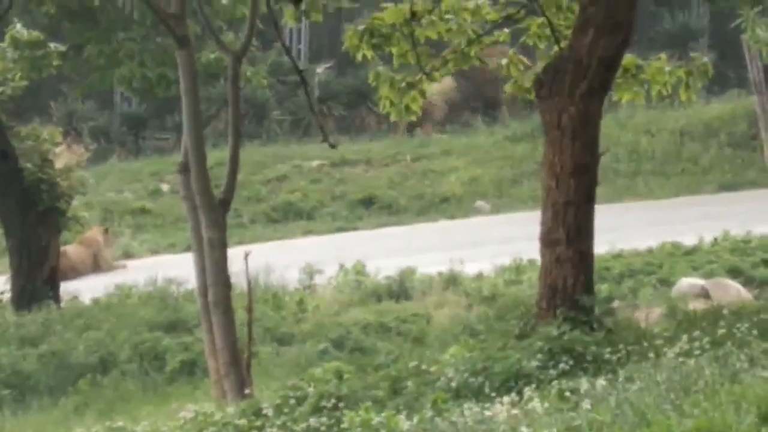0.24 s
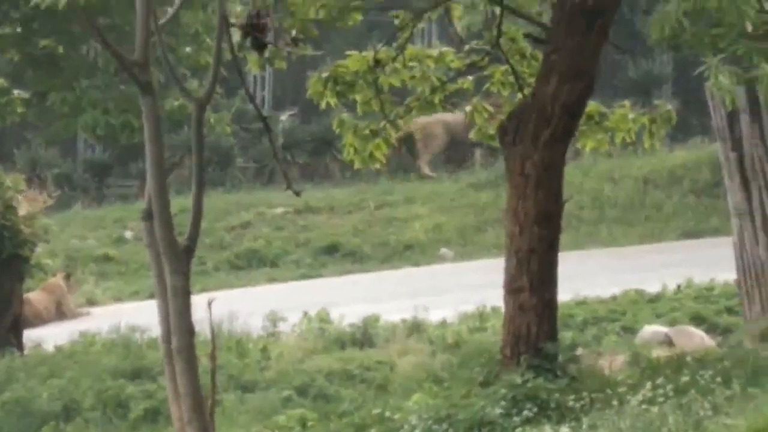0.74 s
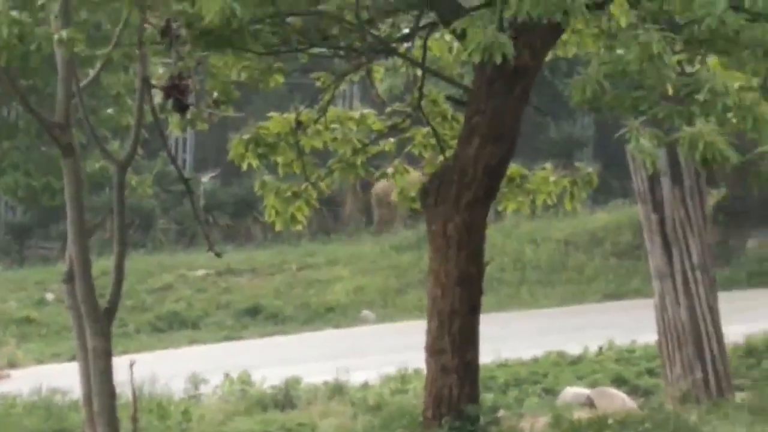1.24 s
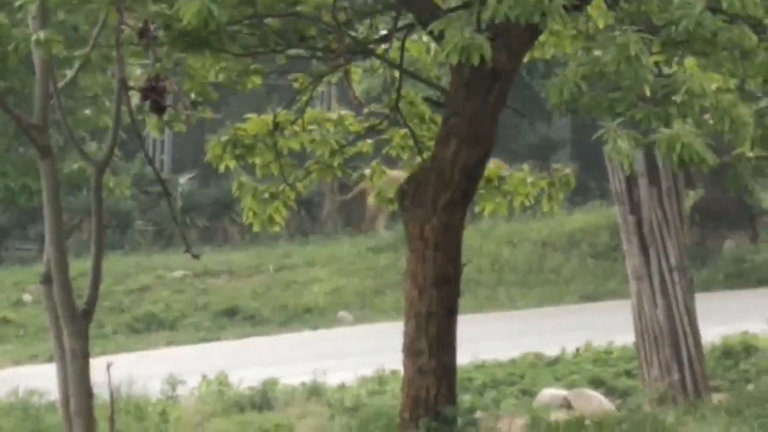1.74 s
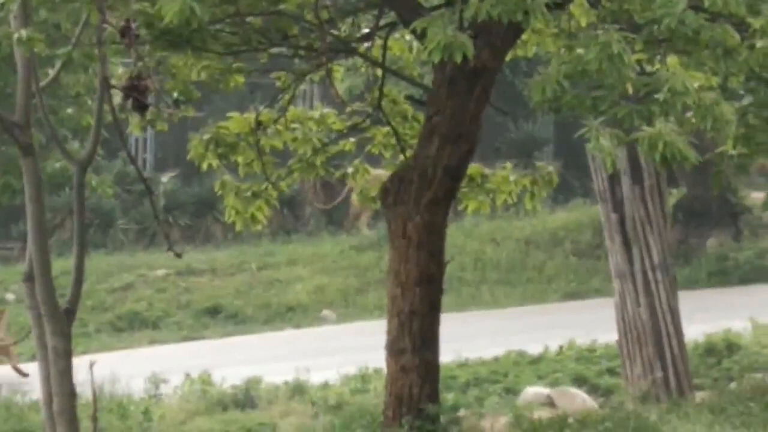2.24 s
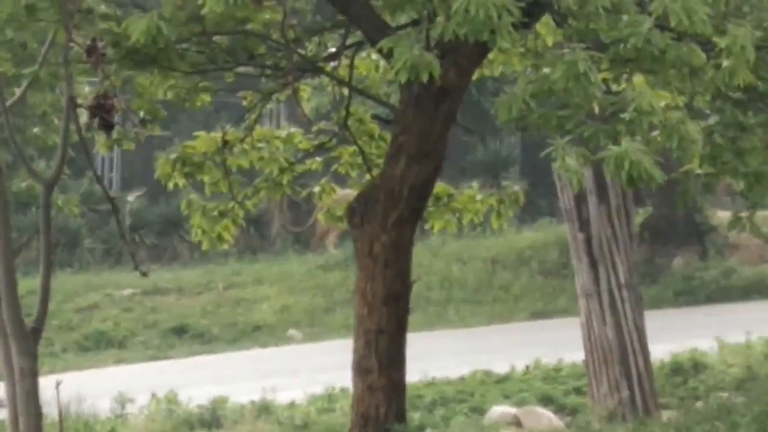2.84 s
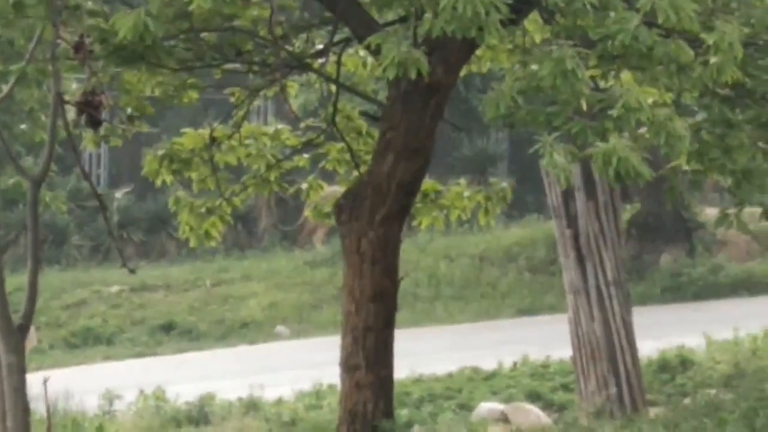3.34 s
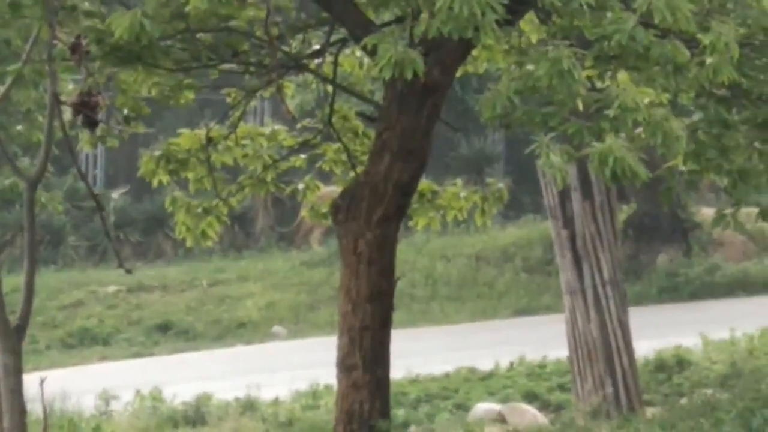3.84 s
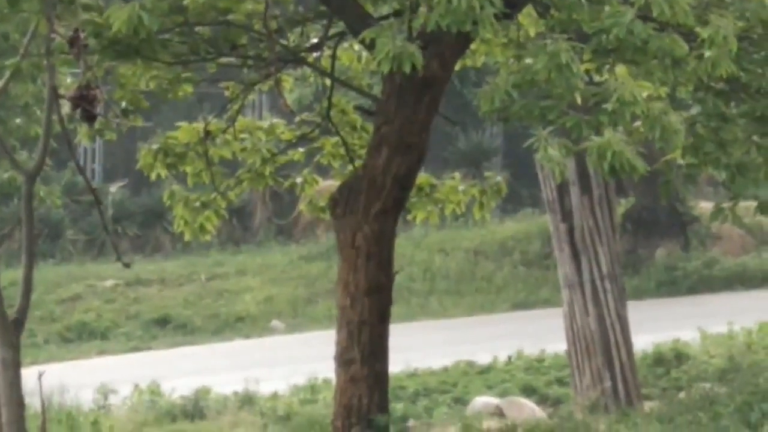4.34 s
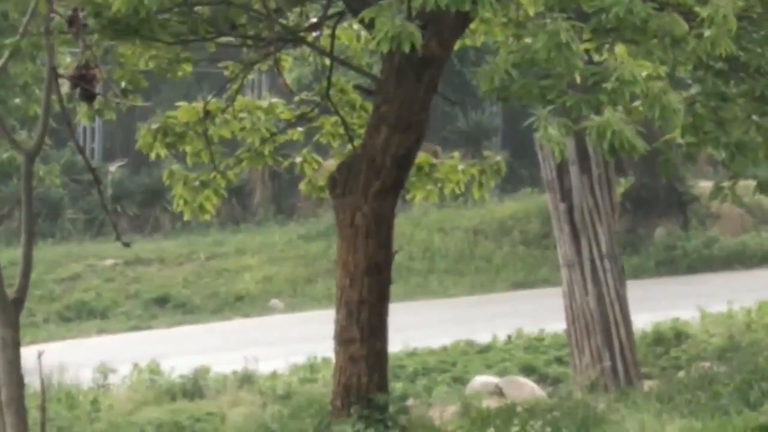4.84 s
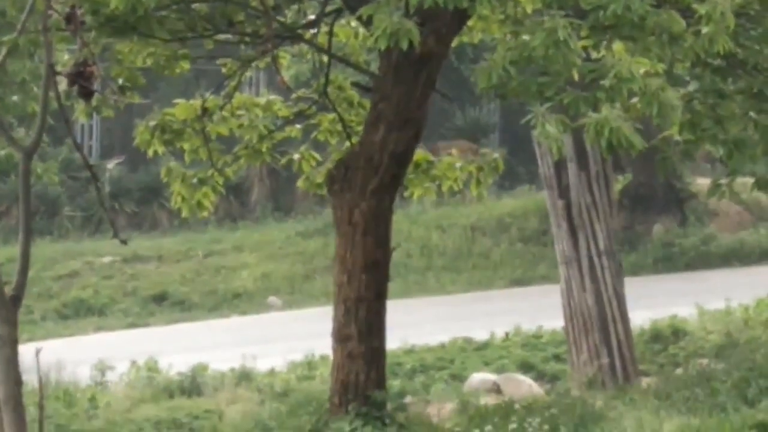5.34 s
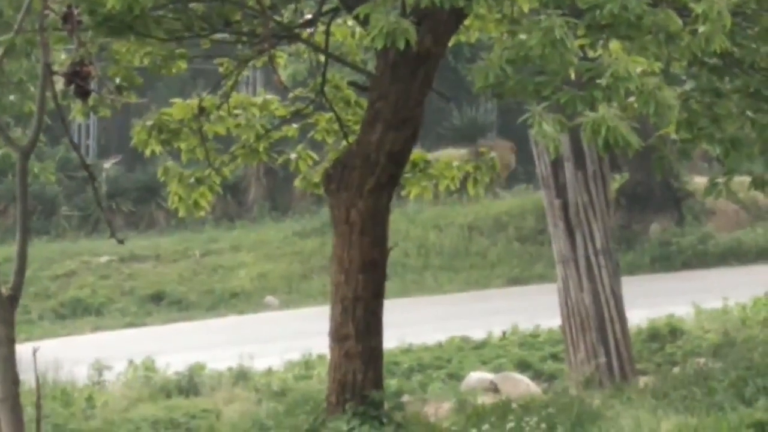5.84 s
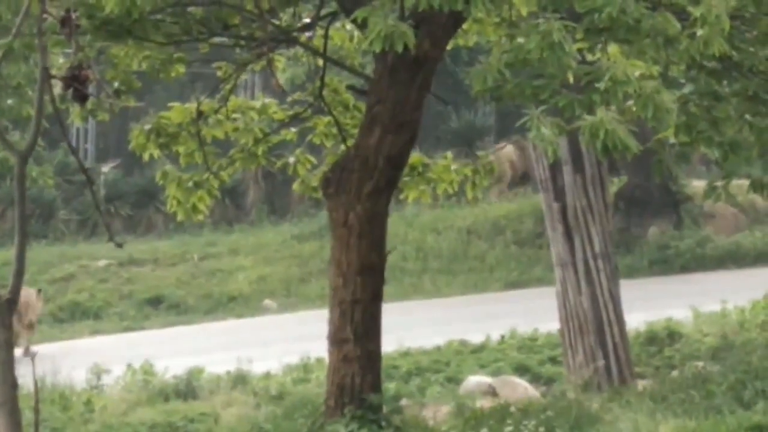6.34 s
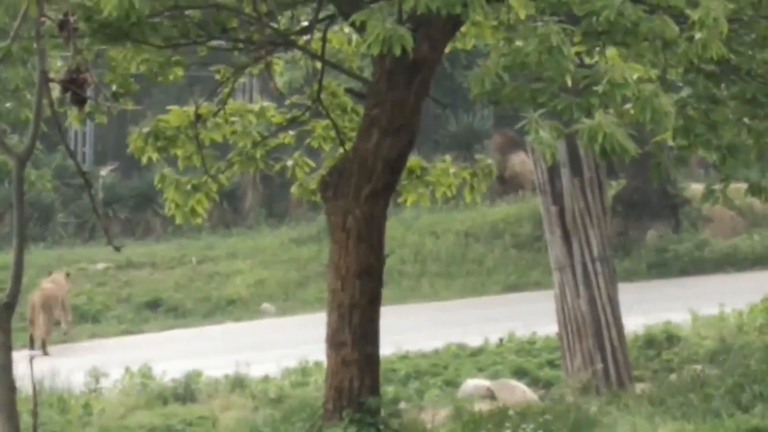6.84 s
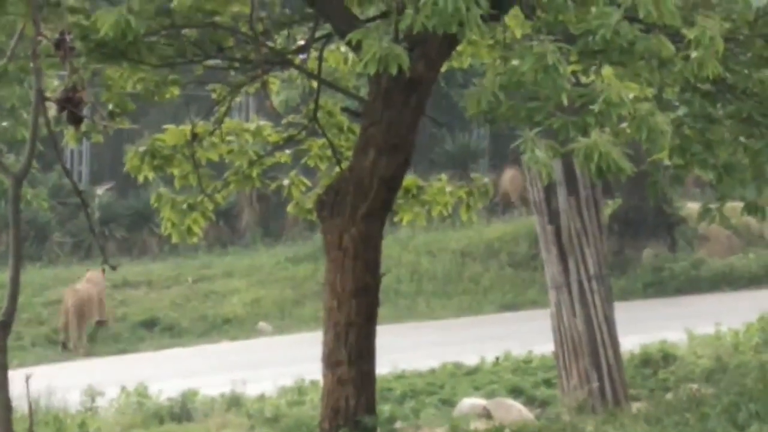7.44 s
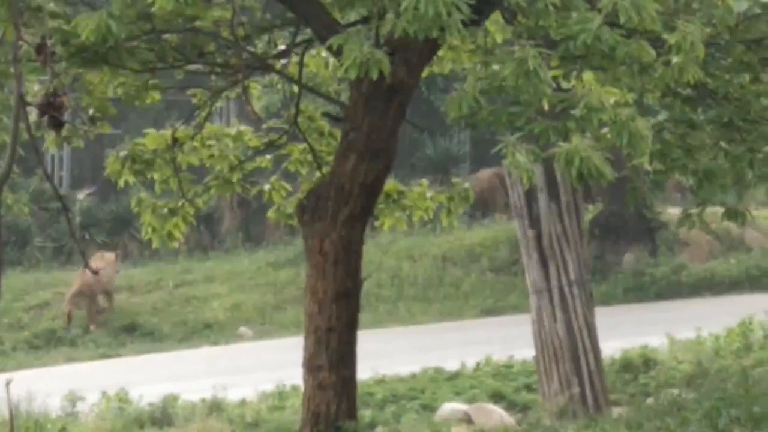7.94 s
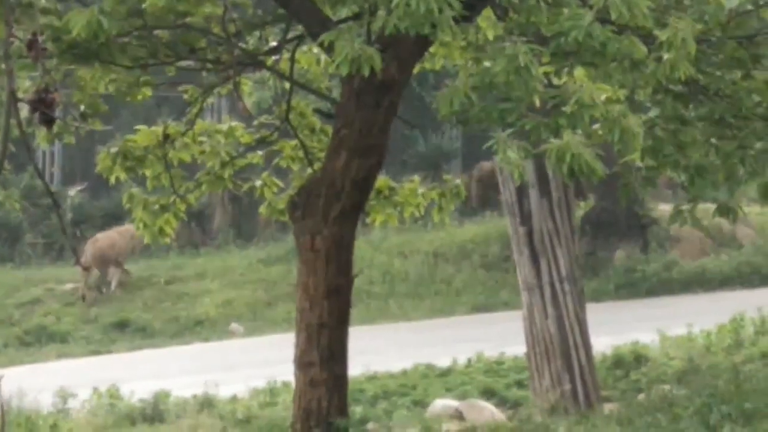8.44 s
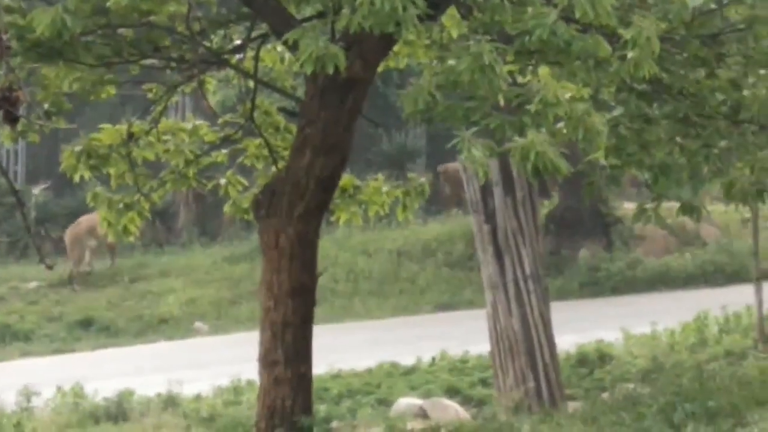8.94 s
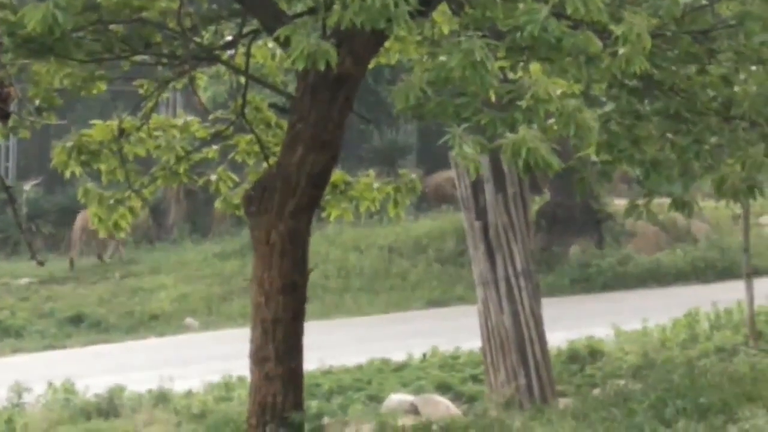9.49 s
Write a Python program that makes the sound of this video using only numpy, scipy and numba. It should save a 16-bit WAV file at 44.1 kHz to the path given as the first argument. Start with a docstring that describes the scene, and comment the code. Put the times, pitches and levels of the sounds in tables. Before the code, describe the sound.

A big cat rumbles at once, then swells into a loud, hoarse open-mouthed roar at about 0.2-0.5 seconds, briefly clearing into a rising moan. Rough growls follow until about 2.3, with hard wet-sounding throat slaps, a sharp dry tick near 0.9, a creaky rattle around 1.3-1.5 and a thump near 2.15. From 2.3 to 3 a bird whistles thin, sliding notes as the growling drops away. The lull holds low chest rumbles, faint chirps and soft hiss, with bird phrases around 4.5-5 and 5.6-6.1. Rumbling builds after 6.1, and a second strong bout of moaning roars bursts out at 6.9-7.7, then sinks into lower grumbles and a long fading growl. The bird answers at 7.8-8.3 and 8.9-9.4. Trees smear everything lightly; the pickup is nearly mono, with slightly wide treble.

```python
"""Big cats and a songbird

Big cats growl and roar in bouts across a grassy slope among trees; a songbird sings phrases close by.
Slow, uneven pulses of the vocal folds ring the chest, throat and mouth, with breath noise between them.
The birds are sliding, near-sine whistles. Trees smear the growls, slaps and bird notes.
Clear moans, hard slaps, lone thumps and dry ticks stand out; a faint hiss lies under it all.
The picture is almost mono: only the scattered treble and part of the hiss are wide.
"""
import sys
import numpy as np
from scipy import signal
from scipy.fft import rfft, irfft
from scipy.io import wavfile
from scipy.ndimage import uniform_filter1d
from numba import njit

SR = 44100
rng = np.random.default_rng(int(sys.argv[2]) if len(sys.argv) > 2 else 0)


def put_to_file(sound):
    """Save the sound as 16-bit audio at rate SR, in the file named by the first command-line argument."""
    columns = np.atleast_2d(sound).T  # one column per channel
    safe = np.clip(columns, -1, 1)
    whole_steps = np.round(safe * 32767)
    wavfile.write(sys.argv[1], SR, whole_steps.astype(np.int16))


N = 428652

# open-mouthed growls: (full from [s], top [s], let go [s], throat level [dB], mouth level [dB],
#   rasp level [dB], sag [dB per s], throat ring [Hz], mouth ring [Hz], low ring level [dB], treble [dB])
GROWL_CALLS = [(0, 0.108, 0.2, -52, -68.5, -71.5, 5, 233, 1190, 4, 6.5),
               (0.205, 0.324, 0.45, -30, -38, -52.5, 57, 337, 1270, 1.5, 3),
               (0.443, 0.492, 0.73, -37.5, -45.5, -59.5, 39.5, 317, 1620, -3, 5.5),
               (0.777, 0.787, 0.87, -46.5, -59, -64, 64, 302, 1670, -5, -1),
               (1.084, 1.107, 1.46, -49.5, -51.5, -60.5, 11, 256, 1700, -2, 0.5),
               (1.555, 1.63, 1.75, -42.5, -48, -45.5, 75, 351, 1503, -4, -1.5),
               (1.79, 1.83, 1.947, -48, -58.5, -55.5, -2, 260, 1620, -11, 0),
               (1.943, 2.005, 2.035, -33.5, -55.5, -55.5, 51, 278, 1370, -12, 2.5),
               (2.093, 2.141, 2.27, -42, -52.5, -55, 112, 312, 1340, -0.5, 5),
               (2.28, 2.387, 2.78, -71, -66.5, -65, 43, 306, 1304, -3, 6.5),
               (4.06, 4.125, 4.29, -66.5, -68, -70, -5, 295.5, 1305, -10, -0.5),
               (4.702, 5.05, 4.92, -67.5, -69, -69, 11, 290, 1330, 7, 3.5),
               (5.25, 5.527, 5.7, -60.5, -74.5, -70, 8, 292, 1380, 3, 0),
               (6.051, 6.23, 5.97, -72, -83, -58, 19, 296, 1400, -14, 7),
               (6.35, 6.416, 6.67, -52, -62, -70.5, 4, 310, 1413, 14, -4),
               (6.867, 6.943, 7.04, -30.5, -42, -53.5, 56.5, 336, 1280, 11, 3),
               (7.086, 7.2, 7.67, -36, -43, -51.5, 23, 266, 1246, 14, -9.5),
               (7.26, 7.29, 7.4, -34, -41.5, -55.5, 44, 307, 1295, 1, -3),
               (7.523, 7.53, 7.72, -52, -61.5, -65.5, 21, 181.9, 1310, 8, -2.5),
               (7.832, 7.997, 8.04, -44.5, -59, -64.5, 24, 186.3, 1230, 4, -7),
               (8.084, 8.152, 8.3, -47, -58, -61, 45, 180, 1299, 4, -6),
               (8.494, 8.792, 9.77, -50, -62, -71, 17.5, 293, 1254, 7, 2),
               (9.596, 9.63, 9.7, -59.5, -89, -99, 10, 292, 1220, -5, 2)]
# still resonances of the throat: (centre [Hz], width [Hz], level [dB])
THROAT_RINGS = [(196.2, 25, -2), (293, 44, -12.5), (311, 45, -3), (378, 20, -13.5)]
# still resonances of the teeth, heard as rasp: (centre [Hz], width [Hz], level [dB])
RASP_RINGS = [(3436, 310, -2.5), (4270, 230, -8.5), (5640, 460, -10), (6690, 450, -13.5), (7500, 750, -40)]
# how loud the hiss is before its colour: (time [s], level [dB])
HISS_LEVEL = [(0, -80.5), (2.9, -83.5), (3.05, -90.5), (4.0, -89.5), (4.1, -87), (6.8, -81), (6.93, -73),
              (7.05, -78.5), (9.72, -84)]
WANDER_SHARE, WANDER_PER_S = 0.032, 6.9   # every moving cavity of throat and mouth drifts a little
RING_FLICKER_DB, RING_FLICKER_PER_S = 2.2, 9   # each moving mouth ring comes and goes a little
RASP_WIDTH_HZ = 250


def amp(db):
    """Turn dB into a gain."""
    return 10 ** (np.asarray(db) / 20)


def rms_one(x):
    """Scale a sound to an rms (average strength) of 1."""
    return x / np.sqrt(np.mean(x ** 2) + 1e-20)


def in_time(rows):
    """Join the rows of a table, time first, into curves with a value for every sample."""
    times, *columns = np.transpose(rows)
    t = np.arange(N) / SR
    return [np.interp(t, times, column) for column in columns]


def even(x, span_s=0.087):
    """Hold the running rms near 1, so that a gain curve can set the level afterwards."""
    power = uniform_filter1d(x ** 2, int(span_s * SR))
    return x / np.sqrt(power + 1e-12)


def flicker(per_s):
    """Slow random wobble of spread 1: noise smoothed so that little faster than per_s is left."""
    r = np.exp(-2 * np.pi * per_s / SR)
    return rms_one(signal.lfilter([1], [1, -2 * r, r * r], rng.standard_normal(N)))


def pole_radius(width_hz):
    """How long a resonance rings; each of two passes is widened to give the pair about this width."""
    return np.exp(-np.pi * 1.5 * width_hz / SR)


def resonance(x, hz, width_hz):
    """A hollow that rings at one pitch: a two-pole peak of gain 1, used twice for dark valleys."""
    r = pole_radius(width_hz)
    b = (1 - r * r) / 2 * np.array([1, 0, -1])
    a = [1, -2 * r * np.cos(2 * np.pi * hz / SR), r * r]
    return signal.lfilter(b, a, signal.lfilter(b, a, x))


def cavity(x, modes):
    """Several resonances ring side by side and add up."""
    return sum(amp(db) * resonance(x, hz, width_hz) for hz, width_hz, db in modes)


@njit
def moving_resonance(x, hz, r, sr):
    """Two two-pole peaks in a row whose centre moves."""
    y, z = np.zeros(len(x)), np.zeros(len(x))
    for i in range(2, len(x)):
        c = 2 * r * np.cos(2 * np.pi * hz[i] / sr)
        y[i] = x[i] - x[i - 2] + c * y[i - 1] - r * r * y[i - 2]
        z[i] = y[i] - y[i - 2] + c * z[i - 1] - r * r * z[i - 2]
    return z


def moving(x, hz, width_hz):
    """A moving resonance whose running rms is held near 1."""
    return even(moving_resonance(x, hz, pole_radius(width_hz), SR))


def trees(x, t60_s=0.69):
    """Scattering: near trunks smear a sound and the far slope adds a fainter tail; unit energy."""
    far_t60_s, far_tail_db = 0.64, -12.5
    t = np.arange(SR) / SR
    decay = amp(-60 * t / t60_s) + amp(far_tail_db - 60 * t / far_t60_s)
    fade_in = np.clip(t / 0.012, 0, 1)
    tail = rng.standard_normal(SR) * decay * fade_in
    return signal.fftconvolve(x, tail / np.sqrt(np.sum(tail ** 2)))[:N]


def whistle(s, hz, db, edge_s, tremble=np.zeros(SR)):
    """A sine that follows a pitch and level contour, with soft edges."""
    t = np.arange(0, s[-1], 1 / SR)
    edge = np.clip(np.minimum(t, s[-1] - t) / edge_s, 0, 1)
    pitch = np.interp(t, s, hz) * (1 + tremble[:len(t)])
    return edge * amp(np.interp(t, s, db)) * np.sin(2 * np.pi * np.cumsum(pitch) / SR)


def clicks_at(rows):
    """One-sample clicks from rows of time and strength."""
    clicks = np.zeros(N)
    for s, db in rows:
        clicks[round(s * SR)] = amp(db)
    return clicks


def folds(rate_hz, hoarse, jitter=.1, shimmer_db=4, puff_sharpness=2.67):
    """Uneven pulses and the puffs of breath noise that each opening of the folds lets through."""
    wander = rms_one(signal.lfilter([1], [1, -.9985], rng.standard_normal(N)))
    turns = np.cumsum(rate_hz * (1 + jitter * hoarse * wander)) / SR
    cycle = turns.astype(int)
    # every cycle draws its own size; the hoarser, the more uneven
    size = amp(shimmer_db * hoarse * rng.standard_normal(2000)[cycle])
    pulses = rms_one(np.diff(cycle, prepend=0) * size)
    fade = np.exp(-puff_sharpness * (1 - hoarse) * (turns - cycle))
    puffs = rms_one(rng.standard_normal(N) * size * fade)
    return pulses, puffs


def call(t, start, stop, held_db):
    """Power of one call: quick attack, the held level, release."""
    attack_db_per_s, release_db_per_s = 354, 167
    before_s, after_s = np.maximum(start - t, 0), np.maximum(t - stop, 0)
    return amp(held_db - attack_db_per_s * before_s - release_db_per_s * after_s) ** 2


def effort():
    """Gain of chest, throat, mouth and rasp: rumbles hold a slope, growls swell to a top and sag."""
    # chest rumbles: (full from [s], let go [s], first level [dB], last level [dB])
    rumble_calls = [(0, 0.902, -48, -45.5), (0.17, 0.235, -46, -42.5), (1.082, 1.426, -42.5, -47),
                    (1.586, 2.212, -42.5, -40), (2.3, 2.956, -61.5, -59.5), (3.433, 3.603, -60.5, -65),
                    (4.065, 4.348, -52, -61), (4.52, 4.63, -63, -63), (4.721, 5.204, -57, -60),
                    (5.278, 5.912, -52.5, -57.5), (6.113, 6.773, -48.5, -51), (6.863, 7.058, -38, -47),
                    (7.115, 7.33, -41, -47.5), (7.381, 7.66, -34.5, -50.5), (7.87, 8.4, -44, -54),
                    (8.494, 9.493, -48, -51), (9.593, 9.678, -53, -59)]
    # floor between calls: (chest [dB], throat [dB], mouth [dB], rasp [dB])
    quiet_db = (-73.5, -80.5, -85, -92.5)
    # how far each part follows the sag: (throat [share], mouth [share], rasp [share])
    sag_shares = (0.92, 0.92, 0.59)
    swell_per_sag = 1.74   # slope up to the top, compared with the sag after it
    t = np.arange(0, N / SR, .001)
    power = amp(quiet_db)[:, None] ** 2 + 0 * t
    for start, stop, first_db, last_db in rumble_calls:
        power[0] += call(t, start, stop, np.interp(t, [start, stop], [first_db, last_db]))
    for start, top, stop, *top_db, sag in np.array(GROWL_CALLS)[:, :7]:
        losses = [swell_per_sag * sag * (top - start), 0, sag * (stop - top)]
        loss_db = np.interp(t, [start, top, stop], losses)
        power[1:] += call(t, start, stop, np.c_[top_db] - np.c_[list(sag_shares)] * loss_db)
    return in_time(np.c_[t, np.sqrt(power.T)])


def mouth_shape():
    """Each growl holds its own mouth shape, climbing a little; between growls the cavities glide."""
    # upper ring of the mouth: (time [s], centre before drift [Hz])
    upper_ring = [(0, 2620), (.25, 2310), (1.5, 2280), (1.56, 2262), (1.68, 2570), (1.8, 2450),
                  (6.95, 2475), (7.2, 2100), (7.35, 2120), (7.6, 2530), (7.9, 2430)]
    throat_rise, mouth_rise = 0.24, 0.14   # share per s
    rows = []
    for start, top, stop, *_, throat_hz, mid_hz, low_db, treble_db in GROWL_CALLS:
        for s in (start, stop):
            throat_now = throat_hz * (1 + throat_rise * (s - top))
            mid_now = mid_hz * (1 + mouth_rise * (s - top))
            rows.append((s, throat_now, mid_now, low_db, treble_db))
    throat_hz, mid_hz, low_db, treble_db = in_time(sorted(rows))
    # the low ring leans with the throat ring
    low_hz = 729.5 + 0.75 * np.maximum(throat_hz - 310, -50)
    centres = (throat_hz, low_hz, mid_hz, *in_time(upper_ring))
    drifting = [hz * (1 + WANDER_SHARE * flicker(WANDER_PER_S)) for hz in centres]
    return *drifting, low_db, treble_db


def creak():
    """Gain that chops mouth and rasp into single pulses for a moment, each loud at its start."""
    # the folds creak: (first [s], last [s], every [s], fall within a pulse [dB])
    first, last, every, fall_db = (1.269, 1.47, .0227, 15)
    t = np.arange(N) / SR
    phase = (t - first) / every % 1
    creaking = (t > first) * (t < last)
    return uniform_filter1d(amp(fall_db * (1 / 3 - phase) * creaking), size=90)


def chest_ring(voiced, chest_hz):
    """The chest rings low: one drifting resonance and a few still ones."""
    # still resonances of the chest: (centre [Hz], width [Hz], level [dB])
    chest_modes = [(77, 18, -9.5), (98, 50, 2.5), (137.6, 58, -12)]
    chest_hz = chest_hz * (1 + 0.083 * flicker(WANDER_PER_S))
    return even(moving(voiced, chest_hz, 32) + amp(-7.5) * even(cavity(voiced, chest_modes)))


def throat_ring(voiced, throat_hz):
    """The throat rings with one resonance that follows the growls and a few still ones."""
    return even(moving(voiced, throat_hz, 55) + amp(-9.0) * even(cavity(voiced, THROAT_RINGS)))


def mouth_ring(breathy, low_hz, mid_hz, low_db):
    """Breath rings the mouth: two moving resonances come and go beside still ones."""
    # still resonances of the mouth: (centre [Hz], width [Hz], level [dB])
    mouth_modes = [(910, 117, -3.5), (1186, 28, -3.5), (1592, 173, -3.5), (1884, 250, -7.5)]
    low_gain = amp(low_db - 4.5 + RING_FLICKER_DB * flicker(RING_FLICKER_PER_S))
    mid_gain = amp(-1.5 + RING_FLICKER_DB * flicker(RING_FLICKER_PER_S))
    low = low_gain * moving(breathy, low_hz, 75)
    mid = mid_gain * moving(breathy, mid_hz, 150)
    return even(low + mid + amp(0.5) * even(cavity(breathy, mouth_modes)))


def teeth_rasp(breathy, mid_hz, high_hz, treble_db):
    """Breath rasps at the teeth: bright resonances, one of which follows the mouth ring."""
    upper_gain = amp(-3.5 + RING_FLICKER_DB * flicker(RING_FLICKER_PER_S))
    upper = upper_gain * moving(breathy, high_hz, RASP_WIDTH_HZ)
    following = amp(treble_db - 11.5) * moving(breathy, 3.03 * mid_hz, RASP_WIDTH_HZ)
    broad = amp(-3.0) * rms_one(resonance(breathy, 2300, 570))
    bright = amp(treble_db - 5.5) * even(cavity(breathy, RASP_RINGS))
    lowpass = signal.butter(4, 8200, fs=SR, output="sos")
    return signal.sosfilt(lowpass, upper + following + broad + bright)


def cats():
    """Pulses drive chest and throat; mouth and teeth hear more of the puffs. Returns mid, side."""
    # the folds and the chest, before their wandering: (time [s], pulse rate [Hz], chest resonance [Hz])
    fold_curve = [(0, 54.05, 124), (.45, 54.16, 148), (.8, 56, 107), (1.2, 57.64, 126), (1.9, 58.2, 119),
                  (2.2, 65.25, 136.3), (4.9, 65.94, 118), (5.27, 60.07, 112), (5.44, 60, 134),
                  (5.7, 59.93, 115), (6.6, 59.06, 121.5), (7.28, 66.06, 128), (7.44, 68.25, 168.4),
                  (7.8, 67.97, 129.5), (8.9, 66.87, 118.2), (9.72, 67.02, 128)]
    # hoarseness: (time [s], noise share [0-1])
    hoarse_curve = [(0, .55), (.25, .7), (.75, .35), (1.0, .5), (1.15, .3), (1.55, .5), (1.75, .25),
                    (2.0, .55), (2.5, .7), (6.4, .55), (7.2, .7), (8.5, .45)]
    # dark gaps between the cavities: (centre [Hz], width [Hz], level [dB])
    valleys = [(506, 137, -18.5), (1054, 150, -21.5), (2750, 890, -8)]
    chest_gain, throat_gain, mouth_gain, rasp_gain = effort()
    rate_hz, chest_hz = in_time(fold_curve)
    hoarse, = in_time(hoarse_curve)
    throat_hz, low_hz, mid_hz, high_hz, low_db, treble_db = mouth_shape()

    pulses, puffs = folds(rate_hz, hoarse)
    voiced = np.sqrt(1 - hoarse) * pulses + np.sqrt(hoarse) * puffs
    breathy = puffs + 0.33 * pulses
    voiced = voiced + amp(-2.5) * trees(voiced)
    breathy = breathy + amp(-3.5) * trees(breathy)

    chest_gain = chest_gain * amp(2 * flicker(15))   # the chest comes in surges
    rattle = amp(0.48 * flicker(39)) * creak()   # mouth and teeth rattle together
    rasp_gain = rasp_gain * rattle * amp(2 + 1.3 * flicker(18.0))
    mid = chest_gain * chest_ring(voiced, chest_hz)
    mid = mid + throat_gain * throat_ring(voiced, throat_hz)
    mid = mid + mouth_gain * rattle * mouth_ring(breathy, low_hz, mid_hz, low_db)
    mid = mid + rasp_gain * teeth_rasp(breathy, mid_hz, high_hz, treble_db)
    for hz, width_hz, db in valleys:
        mid = mid - (1 - amp(db)) * signal.lfilter(*signal.iirpeak(hz, hz / width_hz, SR), mid)

    # the scattered treble differs between the two ears
    highpass = signal.cheby2(8, 50, 4000, "high", fs=SR, output="sos")
    scatter = signal.sosfilt(highpass, rng.standard_normal(N))
    side = rasp_gain * amp(treble_db - 18.5) * rms_one(cavity(scatter, RASP_RINGS))
    return mid, side


def coloured(points):
    """Noise shaped by a curve of gain in dB at each frequency."""
    hz = np.maximum(np.fft.rfftfreq(N, 1 / SR), 10)
    point_hz, point_db = np.array(points).T
    gain = amp(np.interp(np.log(hz), np.log(point_hz), point_db))
    return irfft(rfft(rng.standard_normal(N)) * gain, N)


def hiss():
    """Steady-coloured noise whose level swells, sinks and flickers. Returns mid, side."""
    # colour of the hiss: (frequency [Hz], gain [dB])
    colour = [(40, 39.5), (300, 26.5), (550, 24.5), (1200, 16), (2500, 17), (4500, 10.5), (7500, 1.5),
              (9000, -6.5), (15500, -6)]
    # width of the hiss: (frequency [Hz], side minus mid [dB])
    side_over_mid = [(40, -73), (3800, -58), (4800, -1), (8000, -7.5), (15500, -8)]
    # the level counts for the band from 9500 to 15000 Hz at a colour of 0 dB
    level = amp(in_time(HISS_LEVEL)[0]) / np.sqrt(2 * (15000 - 9500) / SR)
    level = level * amp(1.6 * flicker(20))
    side_colour = [(hz, db + np.interp(hz, *np.transpose(colour))) for hz, db in side_over_mid]
    return level * coloured(colour), level * coloured(side_colour)


def twitter():
    """Rows like those of the far-off birds: short chirps at random moments, mostly low and falling."""
    count, over_hiss_db = 70, 10.5
    when, length, pitch, fall = rng.random((count, 4)).T
    start = when * (N / SR - .1)
    length_s = np.interp(length, [0, 1], (0.024, 0.061))
    from_hz = np.interp(pitch ** 2, [0, 1], (2025, 3620))
    to_hz = from_hz * (1 - .07 * (1.7 * fall - .4))
    db = over_hiss_db + np.interp(when * N / SR, *np.transpose(HISS_LEVEL))
    return list(zip(start, length_s, from_hz, to_hz, db))


def far_birds():
    """Faint far-off birds: short sines that slide in pitch. Returns direct, scattered."""
    # single chirps: (start [s], length [s], from [Hz], to [Hz], level [dB])
    single_chirps = [(0, 0.11, 2660, 2605, -60.5), (3.661, 0.13, 1410, 1310, -77),
                     (3.717, 0.071, 2460, 2320, -75), (5.963, 0.026, 2390, 2000, -62),
                     (5.571, 0.037, 3167, 3270, -66), (5.904, 0.0215, 2433, 2270, -60),
                     (6.335, 0.019, 3300, 3240, -61), (7.6, 0.053, 2569, 2600, -59.5)]
    # one chirp again and again: (first [s], last [s], every [s], length [s], from [Hz], to [Hz], level [dB])
    repeated_chirps = [(3.113, 4.03, .182, 0.038, 2334, 2176, -78),
                       (5.147, 5.22, .0215, 0.019, 4130, 3270, -67)]
    repeats = []
    for first, last, every, *chirp in repeated_chirps:
        repeats += [(s, *chirp) for s in np.arange(first, last, every)]
    direct = np.zeros(N)
    for start, length, from_hz, to_hz, db in single_chirps + repeats + twitter():
        note = whistle([0, length], [from_hz, to_hz], [db, db], 0.0033)
        at = round(start * SR)
        direct[at:at + len(note)] += note
    return direct, amp(-5.0) * direct


def moans():
    """The voice clears into a moan: near-sine stretches that throb a little."""
    # moans: (start [s], length [s], from [Hz], to [Hz], level before the throb [dB])
    moan_tones = [(0.189, 0.15, 262.6, 322.5, -34), (0.307, 0.11, 321.2, 347.6, -28.5),
                  (.735, 0.2, 115.2, 115.6, -43.5), (6.191, 0.14, 122.2, 122, -49),
                  (6.916, .12, 331.3, 292, -29.5), (7.03, 0.071, 349, 336, -28.5),
                  (7.111, 0.17, 274.2, 284.6, -25.5), (7.341, .15, 203.2, 192, -37.5),
                  (7.26, .11, 324.4, 324, -30)]
    clear = np.zeros(N)
    for start, length, from_hz, to_hz, db in moan_tones:
        tone = whistle([0, length], [from_hz, to_hz], [db, db], 0.023)
        at = round(start * SR)
        clear[at:at + len(tone)] += tone
    return clear * amp(1.9 * flicker(25))


def slaps():
    """Each hard slap of the folds rings the open mouth for a few milliseconds, then the trees."""
    # slaps: (time [s], strength before the ring [dB])
    slap_clicks = [(0.799, -42.5), (1.074, -38.5), (1.1647, -36), (1.406, -43), (2.1555, -35.5),
                   (7.729, -45)]
    # the ring of a slap: (centre [Hz], width [Hz], level [dB])
    slap_modes = [(1340, 640, -4), (1660, 350, 3), (2220, 160, 7.5)]
    ring = cavity(clicks_at(slap_clicks) + 1e-18, slap_modes)
    return amp(24.0) * (ring + amp(-2.0) * trees(ring))


def ticks():
    """Short, bright, dry clicks: a single jolt rings three high resonances."""
    # ticks: (time [s], strength before the ring [dB])
    tick_clicks = [(0.8721, -24), (2.8742, -47), (5.4759, -51), (8.889, -48)]
    modes = [(6650, 1100, 9.0), (3930, 690, 4.0), (10200, 4700, -24)]   # (centre [Hz], width [Hz], level [dB])
    return 2.3 * cavity(clicks_at(tick_clicks) + 1e-18, modes)


def thumps():
    """Lone pulses ring the throat."""
    # thumps: (time [s], peak level [dB])
    thump_clicks = [(2.15, -30), (5.516, -47), (5.719, -50), (6.344, -39.5)]
    ring = cavity(signal.unit_impulse(SR // 4), THROAT_RINGS)
    return signal.fftconvolve(clicks_at(thump_clicks), ring / np.abs(ring).max())[:N]


def songbird():
    """A near bird whistles phrases of sliding notes, some trembling. Returns direct, scattered."""
    # note shapes by name: (time into note [s], pitch [Hz], level within note [dB])
    note_shapes = { "arch": [(0, 5850, -2), (.008, 7600, 4), (.014, 7900, 4.5), (.037, 7950, 5.5),
                   (.045, 5930, 4)], "flick": [(0, 4700, -3.5), (.018, 5500, 12.5), (.033, 5830, 12),
                   (.038, 7100, 7), (.048, 5040, -6)], "drop": [(0, 5860, 4), (.006, 4500, 1),
                   (.028, 3970, 9.5), (.04, 3400, -4.5), (.056, 2890, -3)], "lift": [(0, 2580, -1),
                   (.015, 2990, -1), (.03, 3200, -4)], "spit": [(0, 4200, -2.5), (.006, 6580, 6),
                   (.014, 8120, -11.5), (.03, 8100, -17), (.048, 6060, -2.5)], "slide": [(0, 5240, -14),
                   (.018, 4974, -7.5), (.04, 4017, -5), (.055, 3500, -15.5), (.067, 2730, -22)],
                   "climb": [(0, 2900, -16), (.05, 3523, -4), (.1, 4052, -4.5), (.118, 4400, -10),
                   (.15, 5420, -14)], "scoop": [(0, 4490, -15), (.012, 3550, -10), (.03, 2985, -8.5),
                   (.062, 2546, -11.5), (.11, 2817, -10), (.165, 2792, -20.5), (.3, 2693, -20)],
                   "seep": [(0, 7900, 2), (.025, 7245, -4), (.065, 7350, 0), (.18, 7060, -30)],
                   "sigh": [(0, 8300, -11), (.05, 8270, -11.5), (.3, 7650, -5.5), (.36, 7620, -15)],
                   "droop": [(0, 4493, -4), (.03, 3613, 6), (.055, 2950, 4), (.1, 2523, -1)],
                   "rise": [(0, 2900, -12.5), (.05, 3600, -8.5), (.1, 4200, -4), (.118, 4423, -15)],
                   "peep": [(0, 3490, -4), (.02, 3560, -8), (.035, 3250, -6)]}
    # the song: (start [s], note name, level added to the shape [dB], scattered share [dB])
    song_notes = [(2.311, "seep", -59.5, 1), (2.366, "scoop", -42.5, 5.5), (2.765, "droop", -70, 9),
                  (2.951, "sigh", -70.5, -9), (4.523, "spit", -63.5, 4.5), (4.685, "slide", -47, 5),
                  (4.811, "rise", -51.5, 0), (5.633, "arch", -63.5, -5.5), (5.8, "flick", -62, -2.5),
                  (5.861, "arch", -64, -6), (5.992, "drop", -59.5, 0.5), (6.075, "lift", -64, -9),
                  (8.27, "lift", -61, -12), (7.833, "arch", -62, -5), (8.004, "flick", -59.5, -3),
                  (8.066, "arch", -64, -6), (8.186, "drop", -54, -6), (8.931, "spit", -58, 5),
                  (9.03, "peep", -57.5, 0), (9.095, "slide", -44, 2), (9.213, "climb", -57.5, 5)]
    burry = ("slide", "drop", "droop", "scoop")   # notes whose pitch trembles fast
    burr = 0.0335 * flicker(250)
    direct, scattered = np.zeros((2, N))
    for start, name, db, scatter_db in song_notes:
        at = round(start * SR)
        shape = np.transpose(note_shapes[name])
        note = amp(db) * whistle(*shape, 0.0017, burr[at:] * (name in burry))
        direct[at:at + len(note)] += note
        scattered[at:at + len(note)] += amp(scatter_db) * note
    return direct, scattered


def birds():
    """All birds, direct and scattered by the trees; the level of each part flutters fast and at random."""
    far_direct, far_scattered = far_birds()
    near_direct, near_scattered = songbird()
    direct = (far_direct + near_direct) * amp(3.8 * flicker(160))
    scattered = trees(far_scattered + near_scattered, t60_s=0.44) * amp(3.1 * flicker(90))
    return direct + scattered


def level_dips():
    """Gain of the brief dips in level: each is a smooth bell-shaped notch in time."""
    # dips: (centre [s], width [s], depth [dB])
    dip_rows = [(1.001, 0.013, -8), (4.661, 0.016, -5.5), (5.242, 0.0094, -10), (7.79, 0.025, -9),
                (9.56, 0.02, -11)]
    t = np.arange(N) / SR
    return amp(sum(db * np.exp(-((t - s) / width_s) ** 2) for s, width_s, db in dip_rows))


def scene():
    """Mix to left and right: all but the scattered treble and the hiss is in the middle; ticks never dip."""
    cat_mid, cat_side = cats()
    hiss_mid, hiss_side = hiss()
    dips = level_dips()
    mid = dips * (cat_mid + hiss_mid + birds() + moans() + slaps() + thumps()) + ticks()
    side = dips * (cat_side + hiss_side)
    return np.array([mid + side, mid - side])


def record(dry):
    """The microphone loses the deep bass; the top is cut steeply."""
    bass_cut = signal.butter(4, 58, "high", fs=SR, output="sos")
    top_cut = signal.ellip(12, .5, 60, 15450, fs=SR, output="sos")
    return signal.sosfilt(top_cut, signal.sosfilt(bass_cut, dry))


dry = scene()
out = record(dry)
put_to_file(out)
```